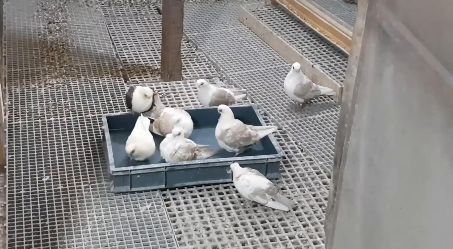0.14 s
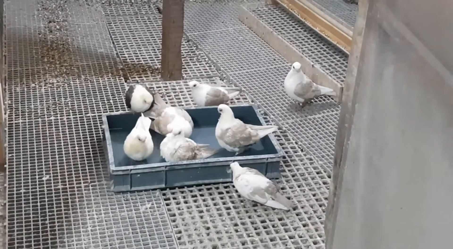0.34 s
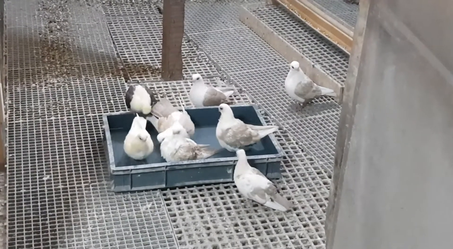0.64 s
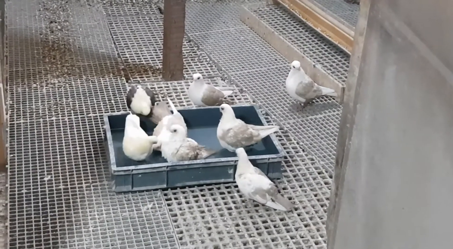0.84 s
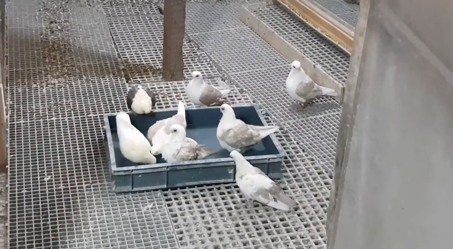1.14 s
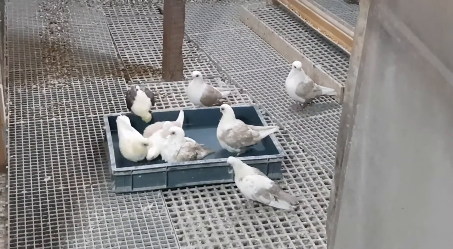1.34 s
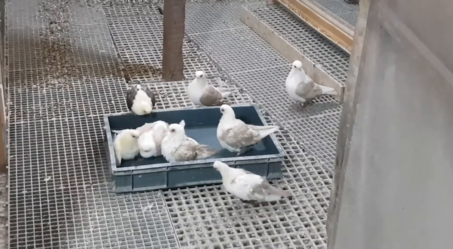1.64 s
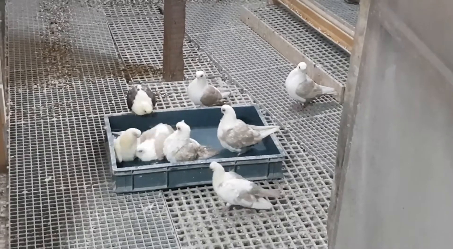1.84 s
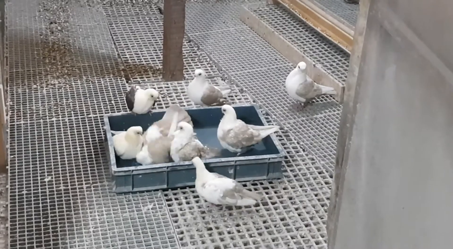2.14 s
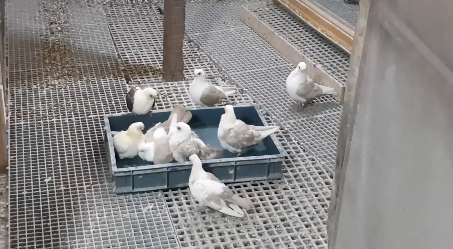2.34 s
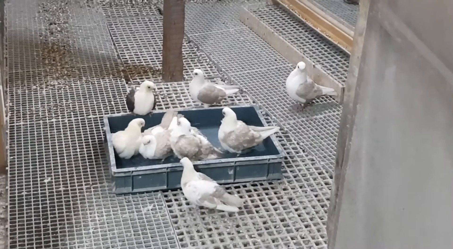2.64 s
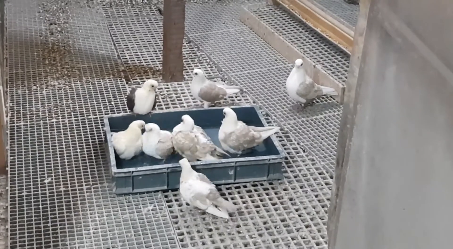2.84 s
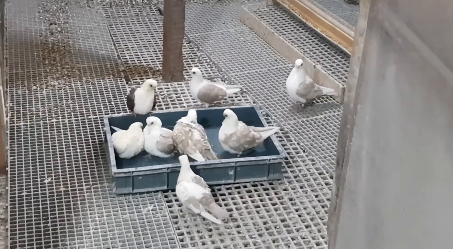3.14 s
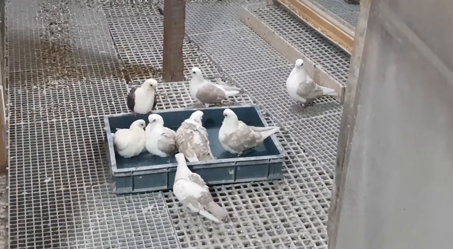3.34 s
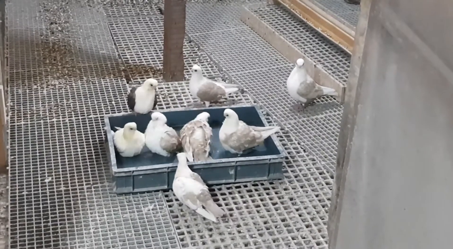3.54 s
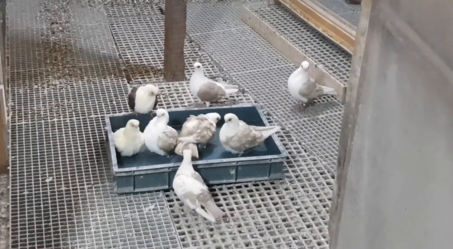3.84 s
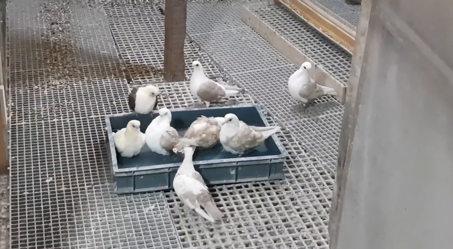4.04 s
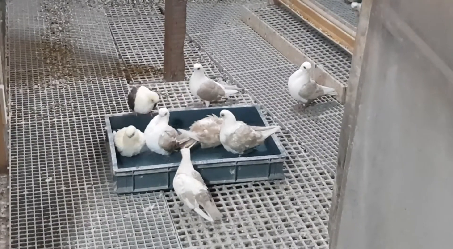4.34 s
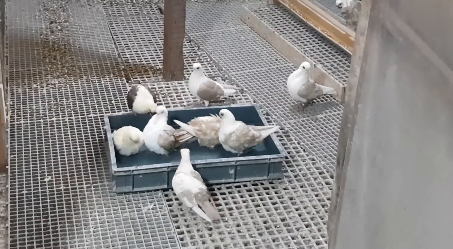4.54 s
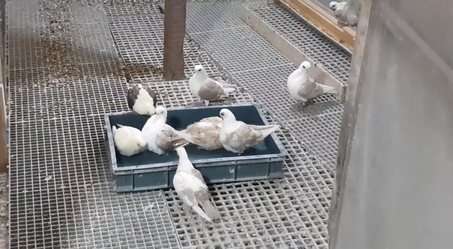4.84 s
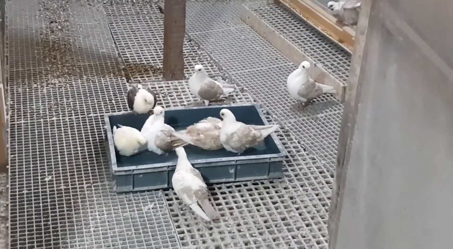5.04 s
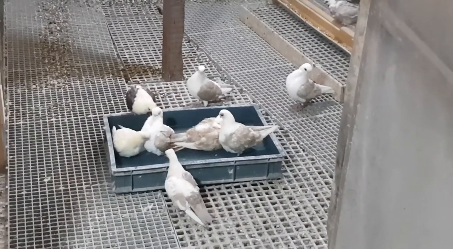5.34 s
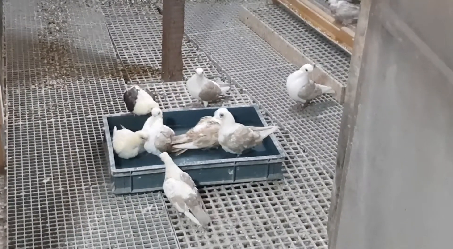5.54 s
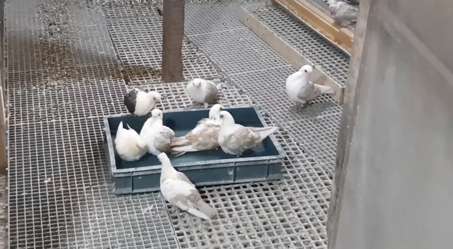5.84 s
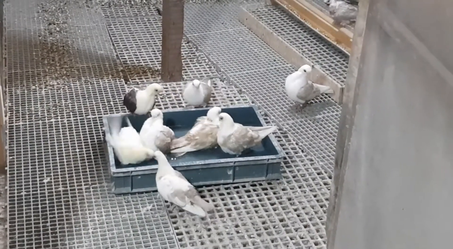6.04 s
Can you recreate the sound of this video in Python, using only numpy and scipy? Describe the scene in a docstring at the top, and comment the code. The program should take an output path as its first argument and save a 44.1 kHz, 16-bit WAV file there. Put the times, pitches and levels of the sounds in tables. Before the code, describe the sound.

Overlapping low, throbbing coos begin at once over a blurred flock murmur and faint rumble. A faint wavering whine stops early. Bathing pigeons stir water with light slops, droplets and feather rustles; one brisk wing stroke snaps by. Later the coos thin out, and hard wingbeats crowd together, airy puffs over soft thumps, followed by scattered flaps and wet rustling. The microphone is fairly near, with a short shed echo.

```python
"""Pigeons bathe in a shallow plastic tub in a coop while others coo nearby; one bird beats its wings and flies.
From the start a blurred flock, a low hum, a thin hiss and a soft wet rustle, all of coloured noise, fill the shed;
a far whine of two sinking resonances stops early. Throaty coos, near-sines chopped by a roll, begin at once, with
slops as noise bursts in water resonances and flicks as bright puffs. Bouts of rustle and droplets follow, then
wing strokes, puffs over low thumps, which crowd together late on; a faint squeak falls midway."""
import sys
import numpy as np
from scipy import signal
from scipy.io import wavfile
from scipy.ndimage import uniform_filter1d

SR = 44100
rng = np.random.default_rng(int(sys.argv[2]) if len(sys.argv) > 2 else 0)


def unload_wav(signal):
    """Save mono or channel-first audio to the path in sys.argv[1] as 16-bit WAV at rate SR, clipped to [-1, 1]."""
    wavfile.write(
        sys.argv[1],
        SR,
        np.round(np.clip(np.atleast_2d(signal).T, -1, 1) * 32767).astype(np.int16),
    )


N = 273407


def amp(db):
    """Decibels to a linear gain."""
    return 10 ** (np.asarray(db) / 20)


def unit_rms(x):
    """Scale a signal to an rms of 1."""
    return x / np.sqrt(np.mean(x ** 2) + 1e-20)


def read_curve(points, hz):
    """Read a frequency curve, straight between its points on a log frequency axis."""
    point_hz, value = np.transpose(points)
    return np.interp(np.log(hz + 1), np.log(point_hz + 1), value)


def columns(rows):
    """Each column of a time curve at every sample."""
    time_s, *rest = np.transpose(rows)
    return [np.interp(np.arange(N) / SR, time_s, column) for column in rest]


def add(mix, start_s, sound):
    """Mix a sound in at its start time, cut at the end of the mix."""
    part = mix[..., round(start_s * SR):][..., :sound.shape[-1]]
    part += sound[..., :part.shape[-1]]


def drift(count, size):
    """Smooth chance of rms 1 that changes over about size samples."""
    smooth = uniform_filter1d(rng.standard_normal(count), size)
    return unit_rms(uniform_filter1d(smooth, size))


def resonate(x, hz, width_hz):
    """A steep resonance: shift hz down to zero, smooth twice, shift back."""
    turn = np.exp(2j * np.pi * np.cumsum(hz * np.ones(x.shape[-1])) / SR)
    r = np.exp(-np.pi * width_hz / SR)
    smooth = signal.lfilter([(1 - r) ** 2], [1, -2 * r, r * r], x / turn)
    return 2 * (turn * smooth).real


# how alike left and right are: frequency_hz, likeness (1 same, 0 unrelated, below 0 opposed)
LIKENESS = [(60, .99), (150, .96), (300, .82), (640, .5), (1400, -.15), (3000, 0), (15000, 0)]
# how far the sound leans left: frequency_hz, left_over_right_db
LEFT_LEAN = [(100, -5), (300, 0.6), (700, 1), (1400, 1), (2400, 0), (4400, -5), (7000, -6), (9000, 3.5),
             (15000, -1.5)]


def noise(colour, patchy_db, size=512):
    """Stereo noise in drifting patches, alike in the bass, slightly opposed in the mids, unrelated in the treble."""
    hz = np.fft.rfftfreq(size, 1 / SR)
    a, b, c, d, patches = rng.standard_normal((N * 4 // size + 5, len(hz), 5)).T
    patches = unit_rms(uniform_filter1d(uniform_filter1d(patches, 9, 0), 9, 1))
    same = np.clip(read_curve(LIKENESS, hz), -1, 1)[:, None]
    lean = amp(read_curve(LEFT_LEAN, hz) / 2)[:, None]
    left = a + 1j * b
    right = same * left + np.sqrt(1 - same ** 2) * (c + 1j * d)
    spectrum = np.array([left * lean, right / lean])
    spectrum *= amp(read_curve(colour, hz)[:, None] + patchy_db * patches)
    out = signal.istft(spectrum, nperseg=size, noverlap=size * 3 // 4)[1][:, :N]
    return out / np.sqrt(np.mean(out.mean(0) ** 2))


def grain(spread_db):
    """Quick flicker of barbs slipping and droplets landing."""
    return unit_rms(amp(spread_db * drift(N, size=60)))


def puffs(rows, crest_db, rise_s, bend):
    """Envelope of puffs that rise quickly and die by their own t60; bend over 1 holds them before the fall."""
    t = np.arange(SR // 2) / SR
    power = np.zeros(N)
    for time_s, peak_db, t60_s in rows:
        fall = amp(peak_db - crest_db - 60 * (t / t60_s) ** bend)
        add(power, time_s - rise_s, (fall * (1 - np.exp(-t / rise_s))) ** 2)
    return np.sqrt(power)


def coo(rows, roll_hz, roll_db, uneven, octave_db, steadied=0):
    """A closed-beak note: a wavering, breathy near-sine in the swollen throat, chopped by a roll.

    The roll starts shut and may even out; rows are time_s, pitch_hz, level_db.
    """
    time_s, hz, db = np.transpose(rows)
    t = np.arange(time_s[0], time_s[-1], 1 / SR)
    pitch = np.interp(t, time_s, hz)
    turns = np.cumsum(pitch * (1 + .019 * drift(len(t), size=300))) / SR
    depth_db = roll_db * np.linspace(1, 1 - steadied, len(t))
    roll_turns = np.cumsum(roll_hz * (1 + uneven * drift(len(t), size=1500))) / SR
    roll = amp(-depth_db * np.cos(2 * np.pi * roll_turns))
    breath = amp(-10.5) * unit_rms(resonate(rng.standard_normal(len(t)), pitch, 110.))
    tone = np.sin(2 * np.pi * turns) + amp(octave_db) * np.sin(4 * np.pi * turns) + breath
    level = amp(np.interp(t, time_s, db)) * signal.windows.tukey(len(t), .15)
    return time_s[0], level * unit_rms(tone * roll)


# the rest of the flock, further off: time_s, level_db
FLOCK_LEVEL = [(0, -54), (1.35, -52), (2.0, -55.5), (2.78, -53), (3.4, -60.5), (3.9, -51.5), (4.3, -60.5),
               (5.1, -49), (5.5, -51.5), (6.2, -56.5)]
# colour of the blurred coos: frequency_hz, density_db_per_hz
FLOCK_COLOUR = [(82, -21), (140, -1), (264, -0.5), (312, -6), (373, -4), (429, -3), (778, -24), (965, -29),
                (1300, -39), (1690, -98), (2860, -120)]


def flock():
    """Many far coos blur into a patchy wash."""
    return amp(columns(FLOCK_LEVEL)[0]) * noise(FLOCK_COLOUR, patchy_db=2.2, size=2048)


# low rumble of the shed and of wing downdraught: time_s, hum_db, thud_db
RUMBLE_LEVEL = [(0, -47, -51), (.65, -54.5, -51.5), (1.1, -46, -49), (1.5, -39, -53), (2.38, -52.5, -48),
                (2.9, -49.5, -53.5), (3.4, -50, -51.5), (4.5, -50.5, -51.5), (4.83, -39.5, -34.5),
                (5.55, -40, -43), (5.75, -41.5, -46), (6.2, -40, -41.5)]
# resonances of the hum: frequency_hz, width_hz, level_db
HUM_MODES = [(55.5, 10, 9), (65.6, 2, 0)]
# resonances of the thud: frequency_hz, width_hz, level_db
THUD_MODES = [(86.8, 45.6, 1.5), (116, 23.6, -10)]


def low_modes(air, modes):
    """Air noise ringing in a few low resonances."""
    return unit_rms(sum(amp(db) * unit_rms(resonate(air, hz, width_hz)) for hz, width_hz, db in modes))


def rumble():
    """Noise in a few low resonances, nearly the same left and right; the hum wavers."""
    hum_db, thud_db = columns(RUMBLE_LEVEL)
    air = rng.standard_normal(N) + 0.11 * rng.standard_normal((2, N))
    waver = unit_rms(amp(1.3 * drift(N, size=6000)))
    return amp(hum_db) * waver * low_modes(air, HUM_MODES) + amp(thud_db) * low_modes(air, THUD_MODES)


WHINE_START_HZ, SINK_HZ_PER_S = 1000, 45
WHINE_DB, WHINE_LOUDEST_S, WHINE_SWELL_DB_PER_S = -64.5, 0.62, 9
WHINE_WAVER_DB, WHINE_END_S, WHINE_FADE_S = 1.7, 1.36, 0.067
UPPER_START_DB, UPPER_FADE_DB_PER_S = 4.5, 11.5  # upper line relative to the lower


def whine():
    """A fuzzy pair of noise resonances that sinks, swells, wavers and ends."""
    t = np.arange(N) / SR
    hz = WHINE_START_HZ - SINK_HZ_PER_S * t
    air = rng.standard_normal(N) + 2.3 * rng.standard_normal((2, N))
    db = WHINE_DB - WHINE_SWELL_DB_PER_S * abs(t - WHINE_LOUDEST_S) + WHINE_WAVER_DB * drift(N, size=4000)
    ending = np.clip((WHINE_END_S - t) / WHINE_FADE_S, 0, 1)
    lower = unit_rms(resonate(air, hz, 32.))
    upper = amp(UPPER_START_DB - UPPER_FADE_DB_PER_S * t) * unit_rms(resonate(air, hz * 1.065, 76.0))
    return ending * amp(db) * (lower + upper)


# colour of the thin hiss: frequency_hz, density_db_per_hz
HISS_COLOUR = [(590, -33), (1000, -0.5), (1320, -28), (2840, -22), (4500, -28), (4880, -5.5), (6510, -8.5),
               (8190, -20.5), (11600, -3), (15600, -4.5)]
HISS_DB = -70.5


def hiss():
    """A steady, slightly patchy noise."""
    return amp(HISS_DB) * noise(HISS_COLOUR, patchy_db=1.0)


DROPS_PER_S, DROP_LOW_HZ, DROP_HIGH_HZ, DROP_CYCLES = 250, 1090, 6400, 3.8  # rate is per channel


def droplets():
    """Sparse plips: a few cycles that glide up, each with its own random moment, side, size and pitch."""
    size = amp(3.4 * np.minimum(rng.exponential(1, (2, N)), 4))
    falls = (rng.random((2, N)) < DROPS_PER_S / SR) * size
    kind = rng.integers(0, 10, (2, N))
    out = np.zeros((2, N))
    for k, hz in enumerate(np.geomspace(DROP_LOW_HZ, DROP_HIGH_HZ, num=10)):
        cycles = np.arange(0, 3 * DROP_CYCLES, hz / SR)
        plip = np.exp(-2 * cycles / DROP_CYCLES) * np.sin(2 * np.pi * cycles * (1 + .006 * cycles))
        out = out + signal.oaconvolve(falls * (kind == k), plip[None], axes=1)[:, :N]
    return unit_rms(out)


# bouts of feathers shaken and water stirred: start_s, length_s, first_db, last_db, dullness (0-1)
RUSTLE_BOUTS = [(.5, 0.3, -70, -67.5, .18), (1.425, 0.47, -74, -70, .3), (1.891, 0.3, -53, -52, 0.68),
                (2.68, 0.048, -70, -70, .35), (3.305, 0.058, -62.5, -66.5, 0.4),
                (4.097, 0.505, -75.5, -59, 0.33), (4.672, 0.52, -48.5, -47.5, 1),
                (5.31, 0.28, -53, -57.5, 1), (5.675, 0.09, -63.5, -66.5, 0.5),
                (5.816, 0.075, -54.5, -53, 0.98), (5.956, 0.3, -55.5, -49.5, 0.71)]
# colour of dry feathers: frequency_hz, density_db_per_hz
DRY_COLOUR = [(710, -17), (1200, -41), (1380, -2), (1570, -19), (2440, -22), (3900, -5), (6530, -1),
              (8640, -15.5), (11400, -4.5), (15600, -21)]
# colour of wet splashing: frequency_hz, density_db_per_hz
WET_COLOUR = [(290, -73), (500, -7), (537, 2.5), (737, -3.5), (1240, -7), (2650, -10), (2890, -10.5),
              (5940, -15), (8150, -24), (15600, -22)]
STILL_DB, STILL_DULLNESS = -75, 0.74  # steady rustle under the bouts
STIR_S, SETTLE_DB_PER_S = 0.043, 77
DROPS_DB = -8  # droplets relative to the wet level


def rustle():
    """Each bout stirs up quickly, holds and settles; its dullness divides it between dry and wet rustle."""
    t = np.arange(N) / SR
    power = np.outer([1 - STILL_DULLNESS, STILL_DULLNESS], amp(2 * STILL_DB) * np.ones(N))
    for start_s, length_s, first_db, last_db, dull in RUSTLE_BOUTS:
        end_s = start_s + length_s
        db = np.interp(t, [start_s, end_s], [first_db, last_db])
        db = db - SETTLE_DB_PER_S * np.maximum(t - start_s - length_s, 0)
        stir = np.clip(1 + (t - start_s) / STIR_S, 0, 1)
        power = power + np.outer(np.clip([1 - dull, dull], 0, 1), (amp(db) * stir) ** 2)
    dry_level, wet_level = np.sqrt(abs(power))
    feathers = dry_level * noise(DRY_COLOUR, patchy_db=2.5)
    splashing = wet_level * noise(WET_COLOUR, patchy_db=2.0)
    return grain(spread_db=1.0) * (feathers + splashing) + amp(DROPS_DB) * wet_level * droplets()


# rolled notes that throb: start_s, length_s, first_hz, last_hz, level_db, swell_db
ROLLED_NOTES = [(.03, 0.15, 256, 268, -52.5, 3), (1.12, 0.28, 264.8, 281, -51.5, 1.5),
                (2.29, 0.38, 199, 305.4, -57, 10.5), (3.58, 0.5, 263, 289, -52.5, -44),
                (.15, 0.11, 468, 472, -59, -4), (.37, 0.13, 463, 461.5, -58, 6),
                (.85, 0.1, 572, 528, -47, -18), (1.56, 0.059, 468, 480, -63, 10.5),
                (2.41, 0.11, 490, 499, -54.5, -3), (2.68, 0.11, 522, 490, -60, -2),
                (3.59, 0.18, 494, 532, -53, -12), (3.79, .18, 538, 477, -65.5, 10.5)]


def rolled_notes():
    """Gliding throat notes under a slow, deep roll."""
    out = np.zeros(N)
    for start_s, length_s, first_hz, last_hz, db, swell_db in ROLLED_NOTES:
        rows = [(start_s, first_hz, db), (start_s + length_s, last_hz, db + swell_db)]
        add(out, *coo(rows, roll_hz=12.5, roll_db=8, uneven=.04, octave_db=-32))
    return out


# slops and gurgles in the tub: time_s, level_db, pitch_hz, width_hz, t60_s
TUB_SLOPS = [(.07, -52, 723, 200, 0.49), (.53, -55.5, 700, 300, 0.23), (0.668, -58.5, 1190, 487, 0.37),
             (.694, -52, 680, 293, .29), (.79, -49.5, 645, 293, 0.53), (.87, -53, 710, 509, 0.15),
             (1.18, -51, 762, 99, 0.55), (1.714, -61, 1110, 800, 0.33), (1.74, -64, 3450, 700, 0.26),
             (1.892, -45.5, 1500, 500, 0.087), (1.939, -46, 3480, 900, 0.082),
             (1.97, -42.5, 727, 121, 0.14), (1.979, -46, 4100, 1200, 0.18), (2.123, -40.5, 2660, 340, 0.16),
             (2.219, -57.5, 1520, 900, 0.31), (2.323, -50, 2180, 457, 0.21), (2.335, -55.5, 700, 119, 0.59),
             (2.454, -56, 1670, 170, 0.12), (2.664, -66, 1730, 895, 0.46), (2.696, -56.5, 1430, 788, 0.33),
             (2.73, -50.5, 1470, 900, 0.1), (3.198, -61.5, 1300, 1216, 0.36),
             (3.352, -53, 1840, 1290, 0.23), (3.525, -50, 653, 130, 0.17), (4.319, -57.5, 896, 282, 0.61),
             (4.499, -57, 4040, 600, 0.51), (4.605, -43.5, 796, 110, 0.25), (4.682, -38, 1530, 420, 0.19),
             (4.609, -54.5, 1780, 200, 0.57)]


def slops():
    """Each slop is a rough burst in one resonance of the water; narrow ones build up more slowly."""
    t = np.arange(SR // 3) / SR
    out = np.zeros((2, N))
    for time_s, db, hz, width_hz, t60_s in TUB_SLOPS:
        water = rng.standard_normal(len(t)) + rng.standard_normal((2, len(t)))
        gurgle = unit_rms(resonate(water, hz, width_hz))
        side_db = read_curve(LEFT_LEAN, hz) * np.c_[[.5, -.5]]
        build_up = 1 - np.exp(-t * width_hz / 1.3)
        add(out, time_s, amp(db - 60 * t / t60_s + side_db) * gurgle * build_up)
    return out


# dry feathers flicked or preened: time_s, peak_db
FEATHER_FLICKS = [(.088, -57.5), (.4224, -55.5), (.453, -56.5), (.531, -53), (.7694, -57), (.9457, -59),
                  (1.1094, -58), (1.3814, -60.5), (1.5464, -52.5), (1.5863, -57), (1.718, -55.5),
                  (1.8143, -53), (2.4574, -56), (2.9602, -57.5), (3.1797, -54), (3.1991, -54.5),
                  (3.2909, -54.5), (3.6082, -60.5), (3.973, -64.5), (4.0353, -56.5), (4.4962, -49.5)]


def flicks():
    """Light, bright puffs of dry feather noise."""
    rows = [(time_s, peak_db, .17) for time_s, peak_db in FEATHER_FLICKS]  # t60 in s
    level = puffs(rows, crest_db=6.0, rise_s=0.0073, bend=1.28)
    return grain(spread_db=0.5) * level * noise(DRY_COLOUR, patchy_db=2.5)


# the nearer bird's long notes: start_s, length_s, top_place (0-1), top_hz, last_hz, level_db, end_swell_db
LONG_NOTES = [(.2, .35, 0.3, 409, 353.2, -45.5, -2), (1.416, 0.213, 0.39, 423, 355, -44.5, -0.5),
              (2.45, 0.37, .4, 405.3, 355.4, -45, 0), (3.633, .4, 0.4, 391.8, 321.6, -45.5, -5.5),
              (5.087, 0.36, 0.44, 402, 360.4, -48.5, 11)]
CLIMB, SOFT_START_DB = .92, -5  # first pitch over top pitch; start relative to the top
SLUMP, SLUMP_S = .589, .0595  # share of the sag done soon after the top, and how soon


def long_notes():
    """The nearer bird's note climbs to a top and sags while its roll evens out."""
    out = np.zeros(N)
    for start_s, length_s, place, top_hz, last_hz, db, swell_db in LONG_NOTES:
        top_s = start_s + place * length_s
        rows = [(start_s, CLIMB * top_hz, db + SOFT_START_DB),
                (top_s, top_hz, db),
                (top_s + SLUMP_S, top_hz + SLUMP * (last_hz - top_hz), db),
                (start_s + length_s, last_hz, db + swell_db)]
        add(out, *coo(rows, roll_hz=30, roll_db=5.5, uneven=.4, octave_db=-45, steadied=.75))
    return out


# a deeper bird's held notes: start_s, length_s, first_hz, last_hz, level_db
DEEP_NOTES = [(.29, 0.15, 210.5, 197, -49), (.85, 0.085, 233, 231, -47.5), (1.02, 0.1, 255, 273, -58),
              (1.4, .24, 231, 198.7, -48.5), (2.75, .25, 289.2, 179.6, -46)]
DEEP_PEAK, DEEP_RISE_DB, DEEP_FADE_DB = 0.084, -1, -5  # loudest place 0-1; start and end relative to it


def deep_notes():
    """A deeper throat with a stronger octave, loudest soon after each start."""
    out = np.zeros(N)
    for start_s, length_s, first_hz, last_hz, db in DEEP_NOTES:
        rows = [(start_s, first_hz, db + DEEP_RISE_DB),
                (start_s + DEEP_PEAK * length_s, first_hz + DEEP_PEAK * (last_hz - first_hz), db),
                (start_s + length_s, last_hz, db + DEEP_FADE_DB)]
        add(out, *coo(rows, roll_hz=29.0, roll_db=1.5, uneven=.15, octave_db=-15.5))
    return out


# the nearer bird's short closing notes: start_s, length_s, first_hz, settled_hz, level_db, fade_db
CLOSING_NOTES = [(0.567, 0.13, 472.4, 391, -52.5, -1.5), (1.683, 0.14, 470.4, 378, -52, -6.5),
                 (2.8, 0.22, 487.7, 404, -47, 0.5), (4.021, .2, 438.3, 371, -47.5, -8.5),
                 (5.45, 0.19, 490.3, 397, -42.5, -9.5)]
DROP_S = 0.11  # time the pitch takes to settle
THROB_HZ, THROB_DB = 11.7, 2.5  # the note comes in pushes


def closing_notes():
    """The nearer bird's short note starts high and drops while its level throbs."""
    out = np.zeros(N)
    for start_s, length_s, first_hz, settled_hz, db, fade_db in CLOSING_NOTES:
        t = np.linspace(0, length_s, 24)
        pitch = np.interp(t, [0, DROP_S], [first_hz, settled_hz])
        throb_db = THROB_DB * np.cos(2 * np.pi * THROB_HZ * (t - .03))
        rows = np.c_[start_s + t, pitch, db + fade_db * t / length_s + throb_db]
        add(out, *coo(rows, roll_hz=32, roll_db=2, uneven=.4, octave_db=-45))
    return out


# wing strokes: time_s, peak_db, t60_s, thump_over_puff_db
WING_STROKES = [(1.9021, -49.5, 0.11, 10.5), (2.118, -32.5, 0.074, -12), (3.349, -45.5, 0.12, -14),
                (4.6776, -21.5, .17, -8), (4.786, -26.5, 0.17, 1), (4.89, -29.5, 0.15, 2.5),
                (5.005, -27, 0.14, -1.5), (5.1083, -26.5, 0.14, 3.5), (5.2394, -38, 0.2, -1.5),
                (5.3614, -41, 0.26, -9), (5.5294, -47, 0.23, 2), (5.8004, -34.5, 0.14, -9),
                (6.0408, -35.5, 0.051, -15), (6.108, -38.5, 0.49, -11)]
# colour of air through the feathers: frequency_hz, density_db_per_hz
STROKE_COLOUR = [(290, -54), (500, -11), (915, -4.5), (1010, 0), (2200, -2.5), (3290, -3), (5770, -3.5),
                 (8510, -16), (12000, -12), (15600, -25)]
# colour of air pushed by a stroke: frequency_hz, density_db_per_hz
THUMP_COLOUR = [(40, -47), (85, 3.5), (160, -10.5), (300, -5), (600, -8), (1200, -57)]


def wing_strokes():
    """Each stroke is a puff of air through the feathers over a low thump."""
    time_s, db, t60_s, thump_db = np.transpose(WING_STROKES)
    puff_level = puffs(zip(time_s, db, t60_s), crest_db=11.5, rise_s=0.009, bend=2.05)
    thump_level = puffs(zip(time_s, db + thump_db, t60_s), crest_db=8.5, rise_s=0.025, bend=2.12)
    strokes = puff_level * noise(STROKE_COLOUR, patchy_db=2.5)
    thumps = thump_level * noise(THUMP_COLOUR, patchy_db=-0.5, size=2048)
    return grain(spread_db=0.5) * strokes + thumps


# a faint falling squeak: time_s, pitch_hz, level_db
SQUEAK_GLIDE = [(3.01, 1680, -79), (3.19, 1480, -81)]


def squeak():
    """One high, breathy note that falls under a fast, rough roll."""
    out = np.zeros(N)
    add(out, *coo(SQUEAK_GLIDE, roll_hz=87.0, roll_db=11.0, uneven=0.38, octave_db=-30.))
    return out


def shed(x, t60_s):
    """Echo of the shed: sparse taps of random sign, partly shared by left and right, dying away."""
    taps = np.zeros((2, SR // 2))
    jitter = rng.integers(0, 20, (2, (SR // 2 - 301) // 20))
    at = np.arange(300, SR // 2 - 20, 20) + jitter
    np.put_along_axis(taps, at, rng.choice([-1., 1.], at.shape), 1)
    taps[1] += 0.22 * taps[0]
    taps *= amp(-60 * np.arange(SR // 2) / SR / t60_s)
    taps /= np.linalg.norm(taps, axis=1, keepdims=True)
    return signal.fftconvolve(x, taps, axes=1)[:, :N]


def scene():
    """Voices slightly left, near water and wings, their echo in the shed, and the background layers."""
    birds = rolled_notes() + long_notes() + deep_notes() + closing_notes() + squeak()
    voices = birds * amp([[.3], [-.3]])
    near = slops() + flicks() + wing_strokes()
    room = amp(-7) * shed(voices, t60_s=.25) + amp(-9) * shed(near, t60_s=.25)
    background = flock() + rumble() + whine() + hiss() + rustle()
    return voices + near + room + background


def record(dry):
    """The band limit: a steep low-pass at 15680 Hz."""
    edge = signal.firwin(1023, 15680, window=("kaiser", 9), fs=SR)
    return signal.oaconvolve(dry, edge[None], "same", axes=1)


dry = scene()
out = record(dry)
unload_wav(out)
```